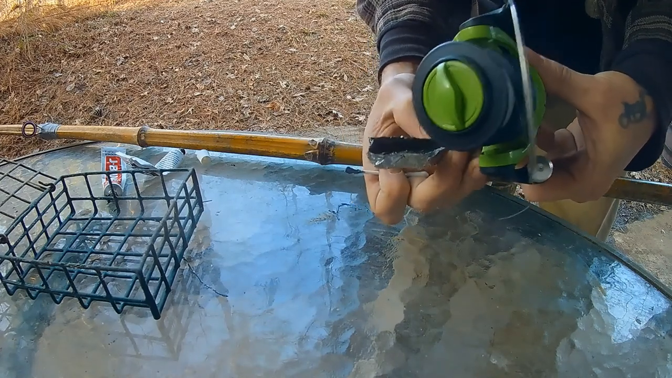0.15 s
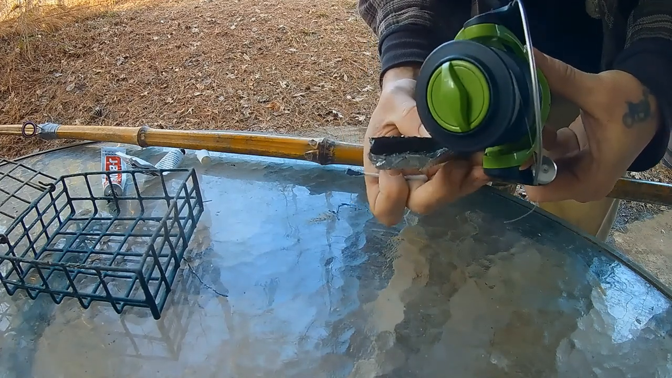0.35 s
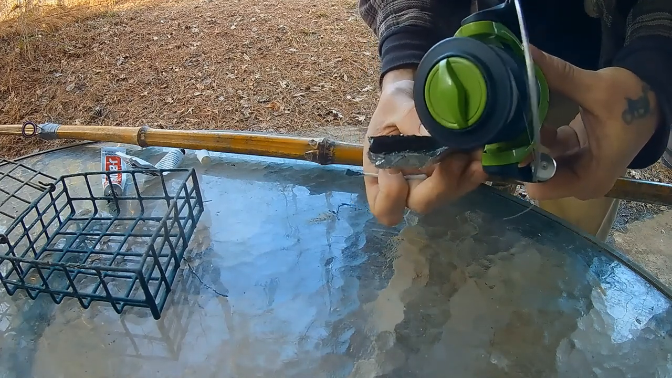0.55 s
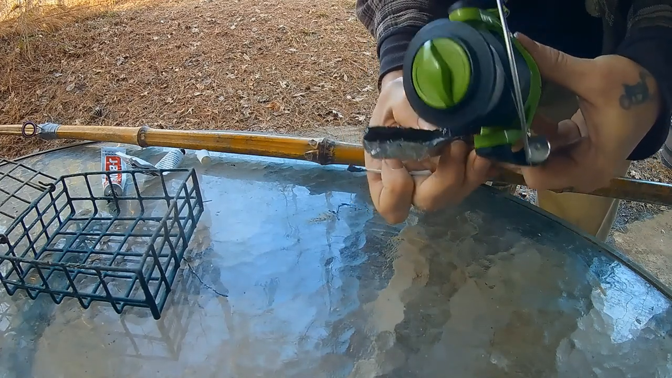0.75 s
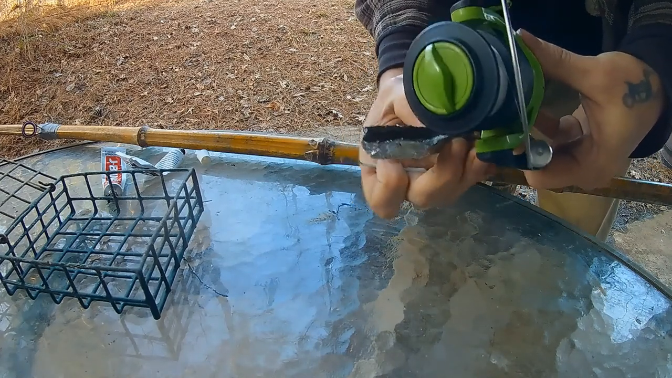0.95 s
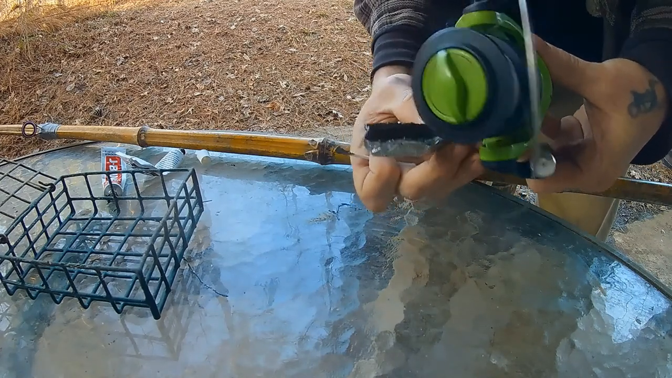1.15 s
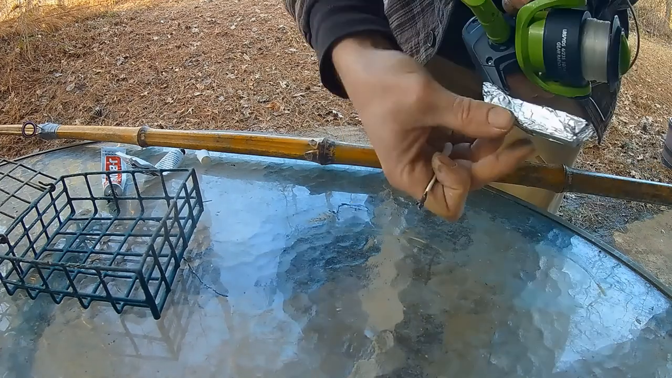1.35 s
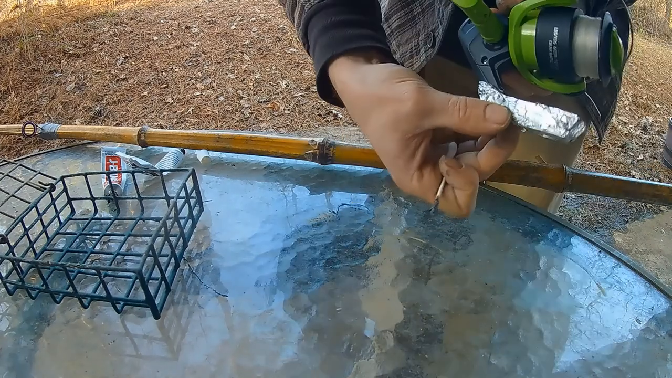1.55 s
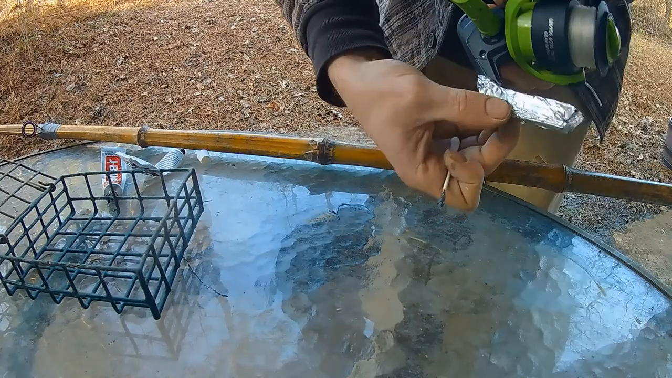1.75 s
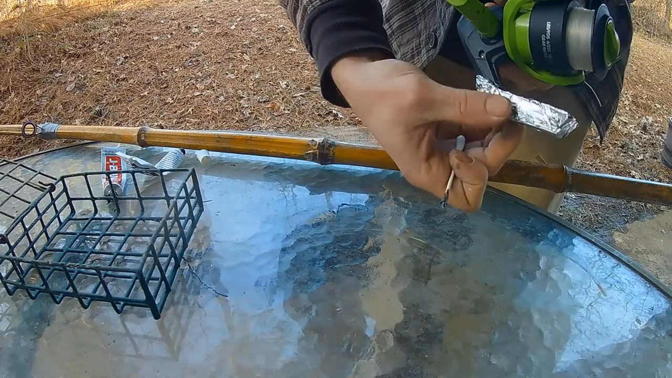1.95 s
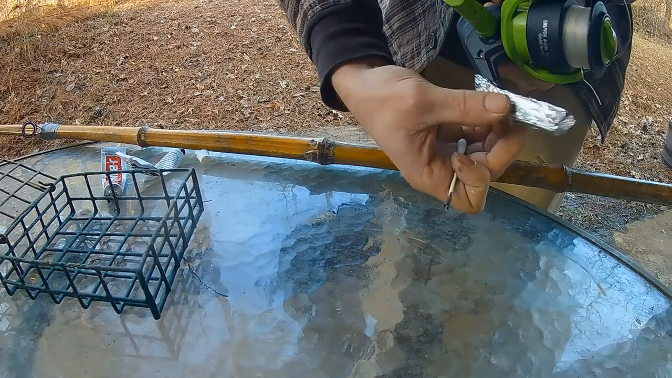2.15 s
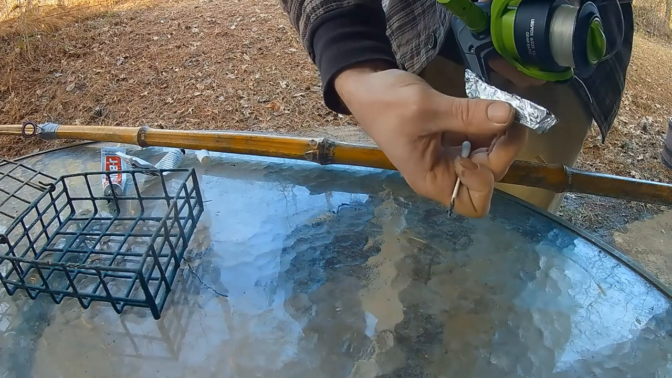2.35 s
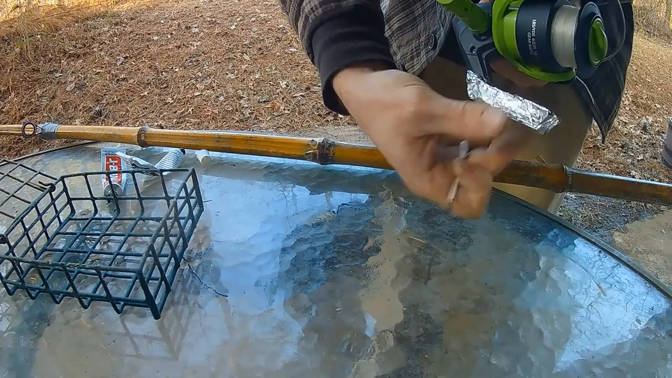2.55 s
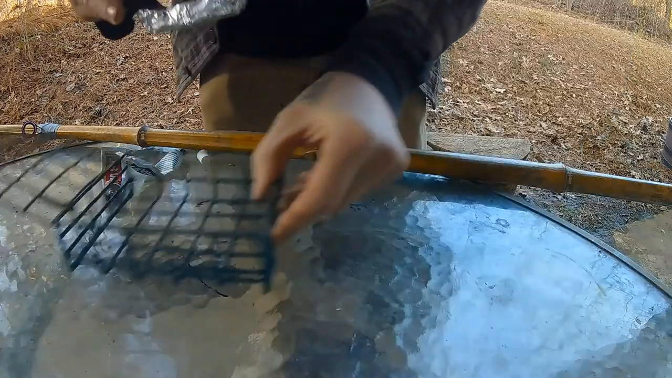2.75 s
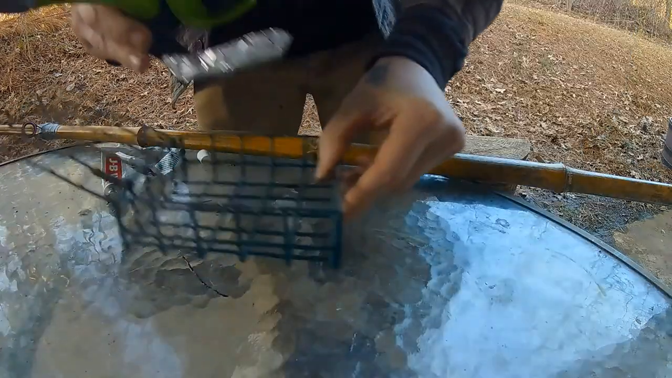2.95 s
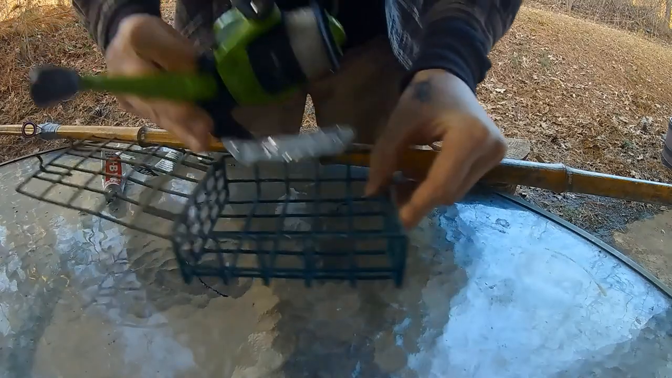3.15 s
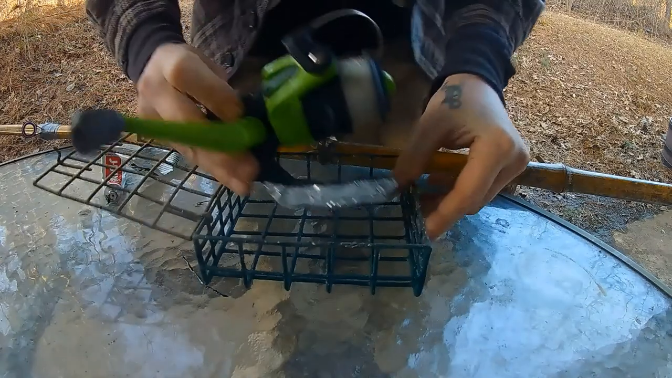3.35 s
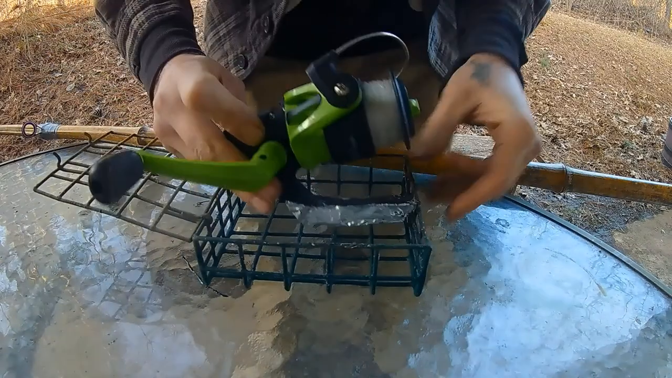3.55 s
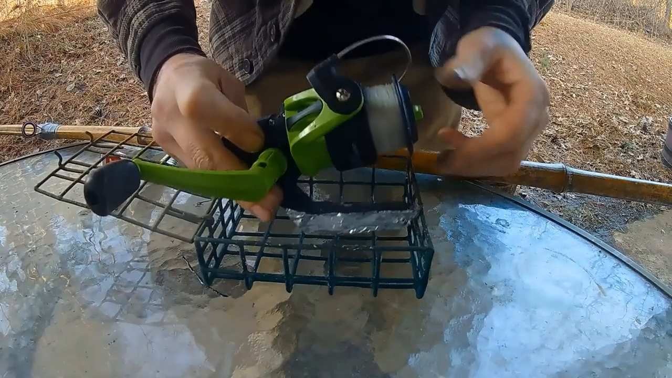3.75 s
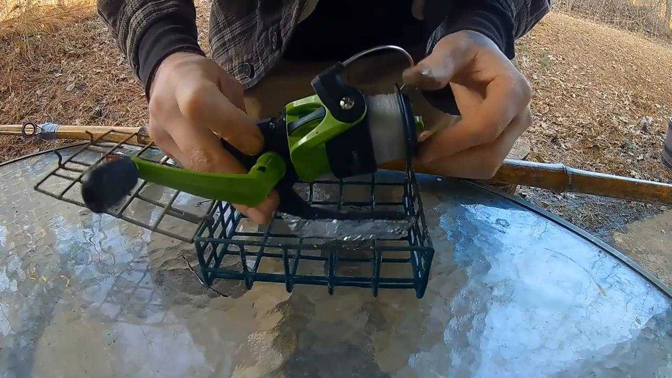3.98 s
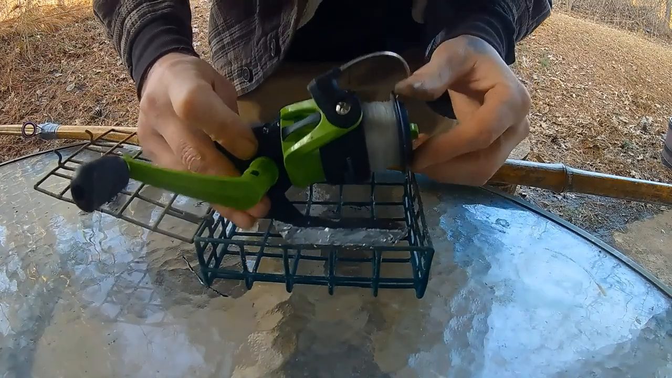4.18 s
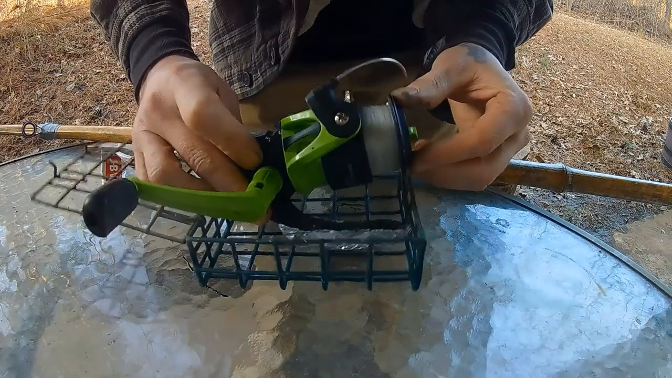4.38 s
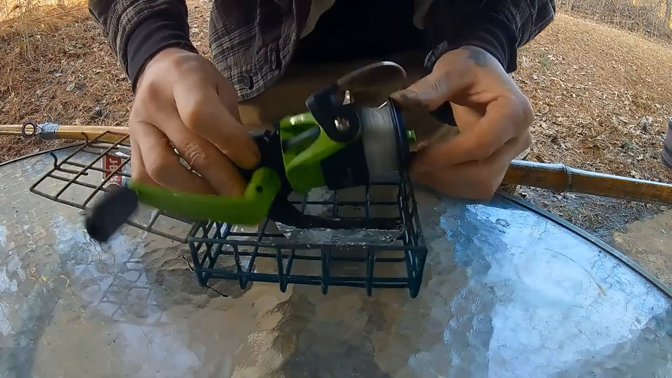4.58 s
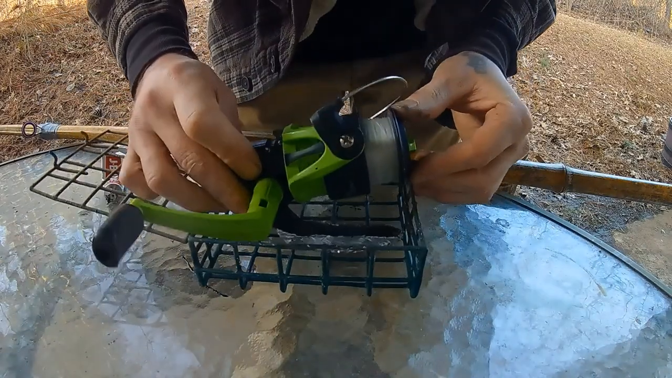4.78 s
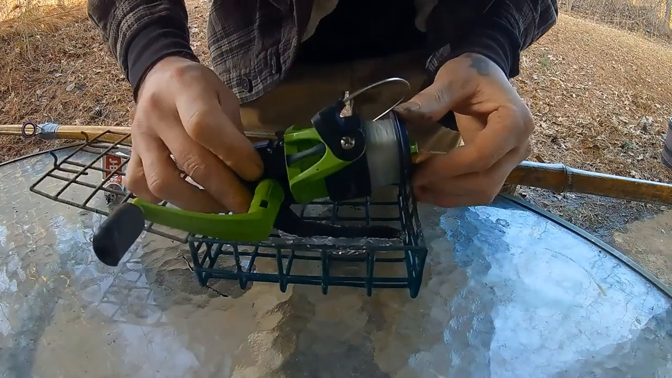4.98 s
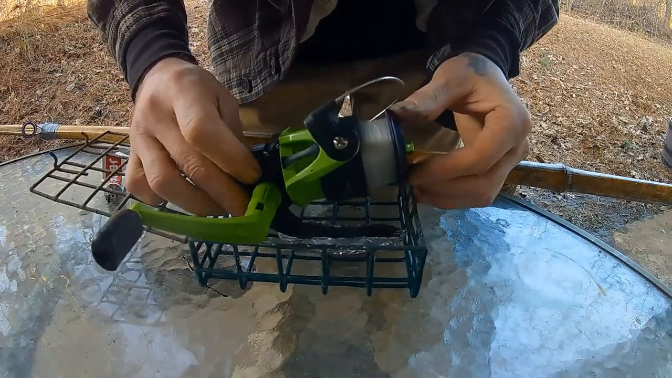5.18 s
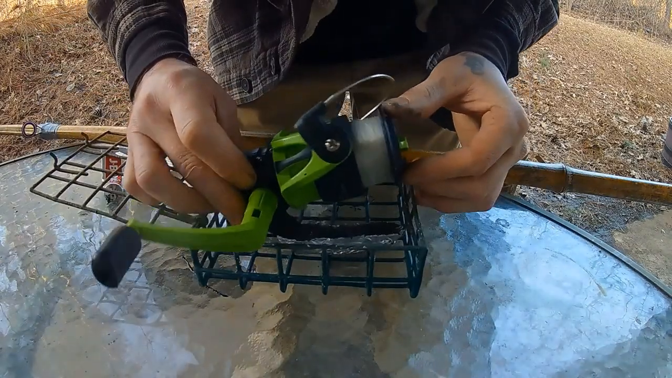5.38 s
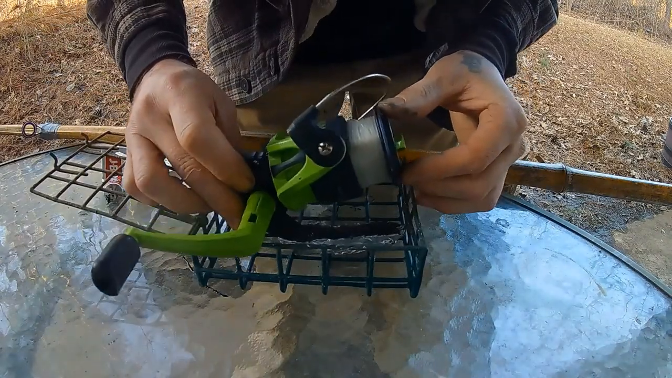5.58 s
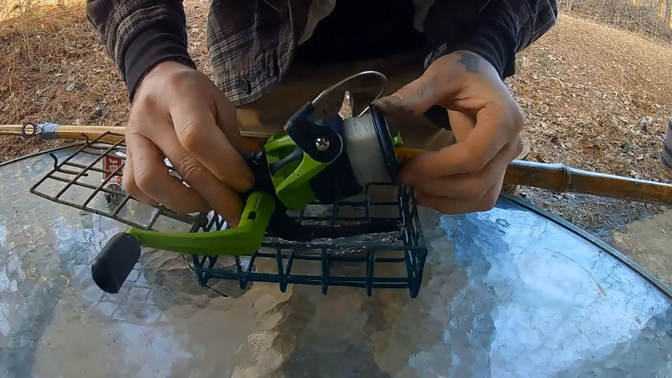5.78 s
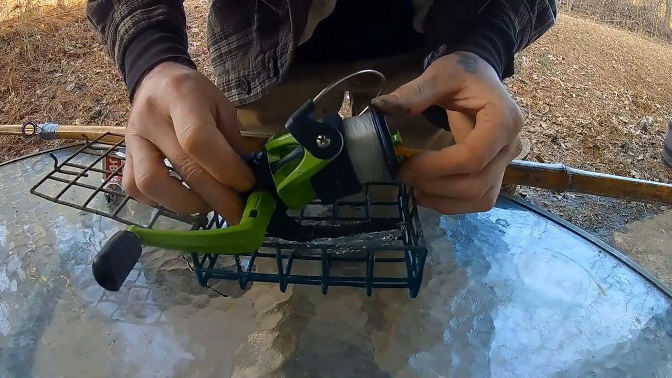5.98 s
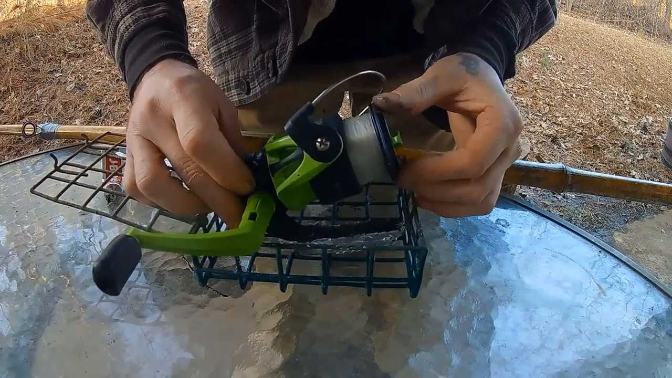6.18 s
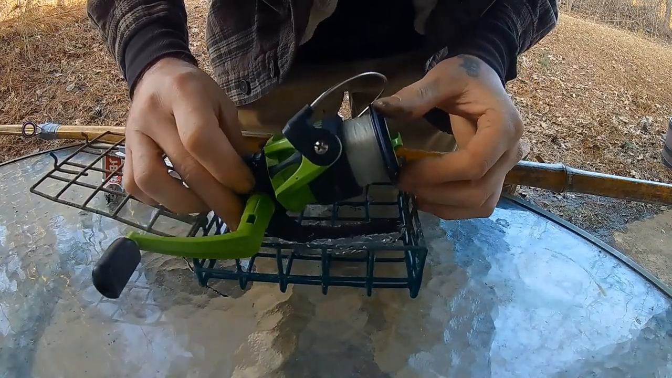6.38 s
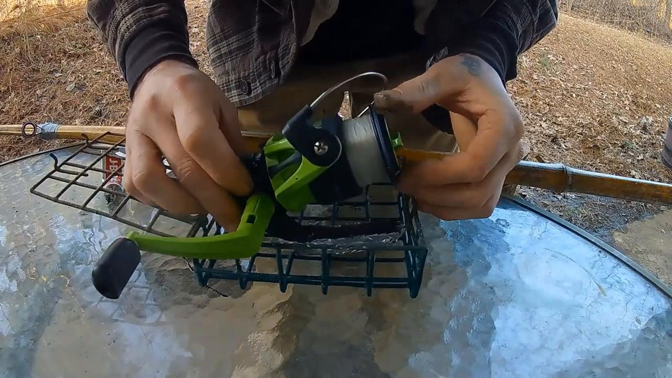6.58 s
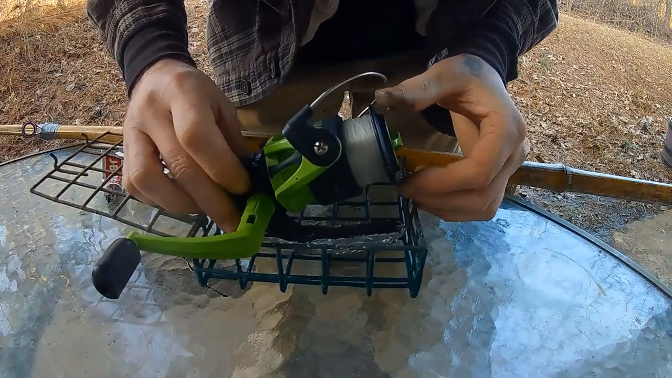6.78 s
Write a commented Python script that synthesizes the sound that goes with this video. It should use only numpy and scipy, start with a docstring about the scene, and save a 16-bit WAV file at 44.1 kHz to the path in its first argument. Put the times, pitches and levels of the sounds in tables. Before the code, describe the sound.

A wire basket clatters onto a glass table outdoors, then a fishing reel knocks against it twice over a quiet low rush.

```python
"""A quiet yard: over a low rush, a far bird chirps and fingers brush and tick on a fishing reel.
Near 3 s a wire basket is dragged over a glass garden table, lands and rocks; each blow bends the
glass, sways the top and rings the wires. Near 4 s and 4.6 s the reel knocks on basket and rod with
a click and a ping, with one soft touch between. Last come one more chirp, soft nudges of a hand on
the table and two finger taps."""
import sys
import numpy as np
from scipy import signal
from scipy.fft import rfft, irfft, next_fast_len
from scipy.io import wavfile
from scipy.ndimage import uniform_filter1d, map_coordinates

SR = 44100
rng = np.random.default_rng(int(sys.argv[2]) if len(sys.argv) > 2 else 0)


def generate_wav(signal):
    """Clip the signal to [-1, 1] and save it as 16-bit WAV at the path in sys.argv[1]."""
    frames = np.transpose(np.atleast_2d(signal))
    scaled = np.clip(frames, -1, 1) * 32767
    pcm = np.round(scaled).astype(np.int16)
    wavfile.write(sys.argv[1], SR, pcm)


N = 301203
TIME_S = np.arange(N) / SR


def amp(db):
    return 10 ** (np.asarray(db) / 20)


def unit_rms(x):
    return x / np.sqrt(np.mean(x ** 2) + 1e-20)


def decay(t, t60_s):
    return np.exp(-np.log(1000) * t / np.maximum(t60_s, 1e-4))


def over_log_hz(points, hz):
    knots_hz, values = np.transpose(points)
    return np.interp(np.log(hz + 1), np.log(knots_hz + 1), values)


def envelope(levels):
    return amp(np.interp(TIME_S, *np.transpose(levels)))


def add(track, start_s, sound):
    part = track[round(start_s * SR):][:len(sound)]
    part += sound[:len(part)]


def filtered(x, gain_at_hz):
    size = next_fast_len(len(x) + 8192)
    return irfft(rfft(x, size) * gain_at_hz(np.fft.rfftfreq(size, 1 / SR)), size)[:len(x)]


def band_noise(count, pitch_hz, width_ratio):
    white = rng.standard_normal(count)
    return unit_rms(filtered(white, lambda hz: 1 / (1 + ((hz / pitch_hz - 1) / width_ratio) ** 4)))


def burst(t, pitch_hz, width_ratio, t60_s):
    """Decaying noise band; longer bursts start more slowly."""
    return band_noise(len(t), pitch_hz, width_ratio) * (1 - decay(t, t60_s / 5)) * decay(t, t60_s)


def patchy_noise(spectrum, patch_db=1.3):
    """Coloured noise, rms 1, with slow patches of random gain."""
    bins = signal.stft(rng.standard_normal(N), nperseg=1024)[2]
    patches = uniform_filter1d(rng.standard_normal(bins.shape), size=8, axis=0)
    patches = uniform_filter1d(patches, size=12, axis=1)
    patchy = signal.istft(bins * amp(patch_db * unit_rms(patches)))[1][:N]
    return unit_rms(filtered(patchy, lambda hz: amp(over_log_hz(spectrum, hz))))


def ring(modes, t, scatter_db=2, detune_ratio=0.003):
    """Damped modes of alternating sign, varied per blow; t drives the decay only."""
    hz, db, t60_s = np.transpose(modes)[:, :, None]
    hz = hz * (1 + detune_ratio * rng.standard_normal(hz.shape))
    strength = amp(db + scatter_db * rng.standard_normal(hz.shape))
    sign = np.cos(np.pi * np.arange(len(modes)))[:, None]
    tones = np.sin(2 * np.pi * hz * np.arange(len(t)) / SR)
    return np.sum(sign * strength * tones * decay(t, t60_s), axis=0)


def impulses(count, rate_hz):
    return (rng.random(count) < rate_hz / SR) * rng.standard_normal(count)


# Modes of short wire stubs: pitch_hz, gain_db, t60_s
STUB_MODES = [(3270, -7.5, .06), (3590, -7, 0.14), (3620, -5, 0.09), (3910, -6, 0.052), (4274, -12.5, .07),
              (4597, -13, 0.078), (4860, -17.5, 0.048)]
# Basket knocks on glass, then one soft touch of the reel: start_s, level_db, contact_hz, wire_db,
# wire_cutoff_hz, metal_db, rattle_db, sway_db, grip_ratio
CONTACTS = [(3.057, -30, 346, -27, 950, -44, -55, -23.5, 0.36),
            (3.0734, -30.5, 820, -24, 3000, -28, -48.5, -7, 0.34),
            (3.0952, -24, 886, -15.5, 3800, -27.5, -46, -13.5, 0.66),
            (3.107, -33, 860, -24.5, 2600, -27, -46, -20.5, 0.42),
            (3.1801, -32, 694, -21.5, 1650, -61, -63, -12.5, 0.31),
            (3.239, -34.5, 790, -22.5, 2300, -40, -51, 3, 0.5),
            (3.346, -42, 244, -34, 900, -44, -60, -4, 0.37),
            (3.4166, -35, 740, -26, 2300, -36, -56, -5, 0.5),
            (4.277, -53.5, 590, -22, 1800, -50, -62, -16, 0)]

def basket():
    """The basket lands and rocks, bare wire cracking and zinging on glass; last, a soft reel touch."""
    out, t = np.zeros(N), np.arange(SR * 3 // 4) / SR
    for start_s, db, contact_hz, wire_db, cutoff_hz, metal_db, rattle_db, sway_db, grip in CONTACTS:
        crack = amp(10) * burst(t, pitch_hz=2180, width_ratio=0.27, t60_s=0.031)
        scrape = amp(-7) * burst(t, pitch_hz=3550, width_ratio=0.27, t60_s=0.07)
        metal = crack + scrape + ring(STUB_MODES, t)
        knock = blow(t, contact_hz, grip, wire_db, cutoff_hz, sway_db, sustain=0.88)
        add(out, start_s, amp(db) * (knock + amp(metal_db) * metal + amp(rattle_db) * rattle(t)))
    return out


def blow(t, contact_hz, grip, wire_db, wire_cutoff_hz, sway_db, sustain, load_detune=1):
    """A push spreads into glass, wires and frame; a firm grip pushes harder and damps the ring."""
    ring_scale = 2.39 * np.exp(-1.88 * grip)
    push_db = -6 + 22.5 * grip
    plate = amp(push_db) * rim_trips(t, contact_hz) + glass(t, ring_scale, sustain, load_detune)
    knock = contact(plate, 1.113 * contact_hz, q=0.91)
    wire_ring = amp(wire_db) * wires(t, ring_scale, wire_cutoff_hz)
    return knock + wire_ring + amp(sway_db) * sway(t, t60_s=0.43 * ring_scale * sustain)


def contact(x, cutoff_hz, q):
    """A springy contact acts as a two-pole low-pass."""
    omega = 2 * SR * np.tan(np.pi * min(cutoff_hz, SR / 4) / SR)
    return signal.lfilter(*signal.bilinear([omega ** 2], [1, omega / q, omega ** 2], SR), x)


def push(t, contact_hz, give_hz=280, clack_cycles=6, leak_hz=150):
    """The glass gives and the contact clacks; deep bass leaks around the rim unradiated."""
    give = np.sin(2 * np.pi * give_hz * t) * decay(t, t60_s=0.012)
    clack = amp(1) * np.sin(2 * np.pi * contact_hz * t) * decay(t, clack_cycles / contact_hz)
    return signal.lfilter(*signal.butter(1, leak_hz, "high", fs=SR), give + clack)


def rim_trips(t, contact_hz, trip_s=0.003527, loss_db=7, pitch_ratio=0.895):
    """The push and two returns from the rim, each weaker and duller."""
    return sum(amp(-loss_db * trip)
               * push(np.maximum(t - trip * trip_s, 0), contact_hz * pitch_ratio ** trip)
               for trip in range(3))


# Bending modes of the top: unloaded_pitch_hz, gain_db, base_t60_s
GLASS_MODES = [(120, -7, 0.57), (162, -10.5, 0.31), (168.5, -17.5, 0.94), (219, -10, 0.23),
               (270.7, -5, 0.22), (299.5, 1.5, 0.24), (320, -7, 0.37), (363, -9, 0.29), (410, -0.5, 0.28),
               (449.4, 1.5, 0.13), (477, 4, 0.076), (509.8, 7, 0.12), (548, 1, 0.17), (604, -2.5, 0.26),
               (709.5, 5.5, 0.14), (809, 7.5, 0.12), (892, 5.5, 0.091), (1031, 4, 0.11), (1133, -0.5, 0.2)]

def glass(t, ring_scale, sustain, load_detune, build_s=0.00049):
    """The plate's ring builds and dies; a load lowers its bending modes."""
    modes = np.array(GLASS_MODES) * [load_detune, 1, ring_scale * sustain]
    plate = amp(-15.5) * ring(modes, t) + amp(-11.5) * weak_modes(len(t), ring_scale)
    return (1 - np.exp(-t / build_s)) * plate


# Spectrum of the weak table modes: frequency_hz, relative_db
WEAK_MODE_SPECTRUM = [(50, -4), (130, 10), (270, 9.5), (500, 8), (820, 1.5), (1100, -5), (1480, -5.5),
                      (1800, -5.5), (2400, -5.5), (3100, -12), (4600, -28.5), (5800, -38), (15000, -23)]
# Their decay: frequency_hz, base_t60_s
WEAK_MODE_DECAY = [(100, 0.38), (400, 0.27), (1000, 0.45), (2500, 0.31), (5000, 0.19), (12000, 0.16)]

def weak_modes(count, ring_scale):
    """Countless weak modes merge into noise whose treble dies first."""
    wash = filtered(rng.standard_normal(count), lambda hz: amp(over_log_hz(WEAK_MODE_SPECTRUM, hz)))
    hz, t, bins = signal.stft(unit_rms(wash), SR, nperseg=256)
    t60_s = ring_scale * over_log_hz(WEAK_MODE_DECAY, hz)[:, None]
    return signal.istft(bins * decay(t, t60_s))[1][:count]


# Basket wire modes: pitch_hz, gain_db, base_t60_s
WIRE_MODES = [(1040, -14.5, 0.062), (1290, -18, .12), (1342, 2, 0.1), (1348, 1.5, 0.12), (1620, 3, 0.076),
              (1720, 1, 0.04), (1875, 4, 0.051), (1940, 4, 0.055), (2133, -7.5, 0.13), (2240, -11, .07),
              (2494, -1, 0.077), (2649, -9.5, 0.07), (2812, -6, 0.085)]

def wires(t, ring_scale, cutoff_hz):
    """Loose wires ring at one touch, then chatter; soft blows miss the high modes."""
    one_ring = ring(WIRE_MODES, t / ring_scale)
    touches = impulses(len(t), rate_hz=350) * decay(t, t60_s=0.053)
    touches[0] = 1
    chatter = signal.fftconvolve(one_ring, touches)[:len(t)]
    return contact(contact(chatter, cutoff_hz, q=0.84), cutoff_hz, q=0.43)


def sway(t, t60_s, pitch_hz=88, build_s=0.019):
    """The whole top bounces on its frame."""
    return np.sin(2 * np.pi * pitch_hz * t) * decay(t, t60_s) * (1 - np.exp(-t / build_s))


def rattle(t):
    """Loose wires shed a dying spray of tiny clicks."""
    touches = impulses(len(t), rate_hz=1400)
    click = burst(t, pitch_hz=11700, width_ratio=0.38, t60_s=0.012)
    spray = signal.fftconvolve(touches, click)[:len(t)]
    return unit_rms(spray) * decay(t, t60_s=0.12)


# Modes of the reel's metal parts: pitch_hz, gain_db, t60_s
REEL_MODES = [(2620, -17, 0.25), (4360, 3, 0.072), (4760, -4.5, .09), (4930, -3, 0.14), (5900, -13, .08)]
# Modes of the basket's top bar, where the reel rests: pitch_hz, gain_db, t60_s
BAR_MODES = [(1332, 0.5, .1), (1374, 1.5, 0.079), (1530, -13, 0.086), (2127, -10, .08), (2625, -21, 0.12)]
# Reel on basket and rod: start_s, level_db, contact_hz, metal_db, wire_db, wire_cutoff_hz,
# sway_db, grip_ratio
REEL_HITS = [(3.957, -30, 484, -30, -21.5, 2200, -11.5, 0.59),
             (3.9756, -32, 820, -50, -18.5, 1700, -39, 0.57),
             (3.9875, -34.5, 603, -60, -18.5, 1100, -38, 0.54),
             (4.5701, -30, 430, -40, -24.5, 1710, -16.5, 0.51),
             (4.5948, -35.5, 444, -60, -26, 1090, -30, 0.53)]

def reel(rattle_db=-55):
    """The reel knocks with a click and a ping, then settles, its weight loading the glass."""
    out, t = np.zeros(N), np.arange(SR * 3 // 4) / SR
    for start_s, db, contact_hz, metal_db, wire_db, cutoff_hz, sway_db, grip in REEL_HITS:
        click = amp(14) * burst(t, pitch_hz=1600, width_ratio=0.36, t60_s=0.014)
        ping = amp(-7) * ring(REEL_MODES, t)
        clink = 0.5 * burst(t, pitch_hz=4550, width_ratio=0.24, t60_s=0.082)
        metal = amp(metal_db) * (click + ping + clink)
        knock = blow(t, contact_hz, grip, wire_db, cutoff_hz, sway_db, sustain=1.16, load_detune=0.95)
        bar = amp(wire_db) * ring(BAR_MODES, t)
        add(out, start_s, amp(db) * (knock + bar + metal + amp(rattle_db) * rattle(t)))
    return out


# Hand on table: start_s, level_db
HAND_BUMPS = [(2.74, -51.5), (3.488, -47), (5.719, -44.5), (6.207, -56), (6.323, -47)]

def nudges():
    """Soft bumps of a hand mostly sway the top."""
    out, t = np.zeros(N), np.arange(SR * 3 // 4) / SR
    for start_s, db in HAND_BUMPS:
        bump = blow(t, contact_hz=238, grip=0.24, wire_db=-38, wire_cutoff_hz=900,
                    sway_db=8.5, sustain=0.29)
        add(out, start_s, amp(db) * bump)
    return out


# Basket slips: start_s, level_db
FOOT_SLIPS = [(2.833, -54.5), (2.876, -50), (2.882, -54), (2.901, -55)]

def drag():
    """The basket's feet stick and slip on the glass."""
    out, t = np.zeros(N), np.arange(SR // 5) / SR
    for start_s, db in FOOT_SLIPS:
        add(out, start_s, amp(db) * burst(t, pitch_hz=1000, width_ratio=0.43, t60_s=0.046))
    return out


# Fingers on the reel: start_s, level_db, pitch_hz, width_ratio, t60_s
FINGER_TICKS = [(0.848, -52, 1200, 2.4, 0.0094), (1.274, -61, 2830, 0.32, 0.023),
                (1.321, -76, 4800, .25, .03), (6.323, -55.5, 646, 0.66, 0.04),
                (6.486, -60.5, 1020, 0.83, 0.072)]

def ticks():
    """Fingers make small, hard contacts on metal and plastic."""
    out, t = np.zeros(N), np.arange(SR // 5) / SR
    for start_s, db, pitch_hz, width_ratio, t60_s in FINGER_TICKS:
        add(out, start_s, amp(db) * burst(t, pitch_hz, width_ratio, t60_s))
    return out


# Rubs on the gear: start_s, length_s, level_db, pitch_hz
RUBS = [(0.275, 0.28, -87, 3200), (4.69, 0.13, -83, 3600), (4.822, 0.11, -87, 2600)]

def brushes():
    """Fingers and sleeves rub the gear; the friction swells and fades."""
    out = np.zeros(N)
    for start_s, length_s, db, pitch_hz in RUBS:
        count = round(length_s * SR)
        add(out, start_s, amp(db) * np.hanning(count) * band_noise(count, pitch_hz, width_ratio=0.35))
    return out


# Rumble under the hands: time_s, level_db
RUMBLE_LEVELS = [(0, -75), (2.4, -71.5), (2.8, -61.5), (3.6, -57), (4.4, -61.5), (5.3, -64), (5.9, -67),
                 (6.35, -59.5), (6.8, -56)]
# Its spectrum: frequency_hz, relative_db
RUMBLE_SPECTRUM = [(22, -13), (50, -6), (88, -7.5), (140, -13), (220, -15.5), (600, -49.5), (2000, -105.5)]

def table_rumble():
    """Hands shifting on the gear make the table rumble faintly."""
    return envelope(RUMBLE_LEVELS) * patchy_noise(RUMBLE_SPECTRUM)


# Far chirps: start_s, length_s, level_db
BIRD_CHIRPS = [(0.266, 0.026, -81), (0.4, 0.024, -84), (0.744, 0.027, -73), (0.855, 0.038, -73),
               (1.52, .018, -83), (5.61, 0.022, -81)]

def bird(from_hz=6700, to_hz=7690, flutter_hz=170, echo_db=-2):
    """Thin rising whistles with a quick flutter, scattered by trees."""
    out = np.zeros(N)
    for start_s, length_s, db in BIRD_CHIRPS:
        progress = np.linspace(0, 1, round(length_s * SR))
        flutter = map_coordinates(rng.standard_normal(11), [10 * progress])
        pitch_hz = from_hz + (to_hz - from_hz) * progress + flutter_hz * flutter
        whistle = np.sin(2 * np.pi * np.cumsum(pitch_hz) / SR)
        add(out, start_s, amp(db) * np.sin(np.pi * progress) * whistle)
    t = np.arange(SR // 2) / SR
    trees = rng.standard_normal(len(t)) * decay(t, t60_s=0.35)
    return out + amp(echo_db) * signal.fftconvolve(out, trees / np.linalg.norm(trees))[:N]


# Outdoor rush: frequency_hz, relative_db
RUSH_SPECTRUM = [(22, -9.5), (48, 3), (80, -4.5), (150, -9), (220, -15), (420, -15.5), (880, -20.5),
                 (1150, -26.5), (1500, -35), (2100, -38.5), (3000, -47), (6000, -59.5)]

def yard(level_db=-57):
    """A steady, distant rush."""
    return amp(level_db) * patchy_noise(RUSH_SPECTRUM)


# Faint high hiss: frequency_hz, relative_db
HISS_SPECTRUM = [(1500, -0.5), (3000, 0), (4600, -2), (6000, -8.5), (8000, -10), (10000, -23),
                 (15500, -31.5)]
# Its level: time_s, level_db
HISS_LEVELS = [(0, -87), (1.4, -86), (2.1, -86.5), (3.8, -87), (4.8, -85.5), (5.2, -87), (6.4, -88.5),
               (6.8, -85)]

def hiss():
    """A faint high hiss; its level wavers slightly over time."""
    return envelope(HISS_LEVELS) * patchy_noise(HISS_SPECTRUM)


def scene():
    """Table, gear and hands close by; yard and bird behind; a faint hiss. Mono."""
    close = drag() + basket() + reel() + nudges() + ticks() + brushes() + table_rumble()
    return (close + yard() + hiss() + bird())[None]


# Brief level dips: centre_s, half_width_s, gain_db
LEVEL_DIPS = [(1.248, 0.021, -22), (2.712, 0.019, -21)]
# Noise floor: frequency_hz, relative_db
FLOOR_SPECTRUM = [(500, 17.5), (2000, 6), (6000, 5), (11000, -2)]

def record(dry, floor_db=-91, cutoff_hz=15720):
    """The level dips twice over a steady noise floor; nothing passes above the cutoff."""
    dip_db = sum(gain_db * np.exp(-((TIME_S - centre_s) / half_width_s) ** 4)
                 for centre_s, half_width_s, gain_db in LEVEL_DIPS)
    heard = dry[0] * amp(dip_db) + amp(floor_db) * patchy_noise(FLOOR_SPECTRUM)
    return filtered(heard, lambda hz: hz < cutoff_hz)[None]


dry = scene()
out = record(dry)
generate_wav(out)
```